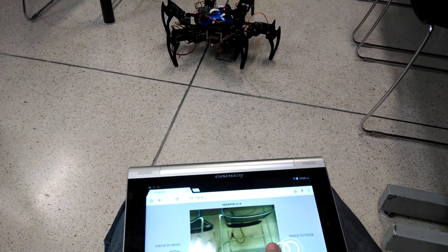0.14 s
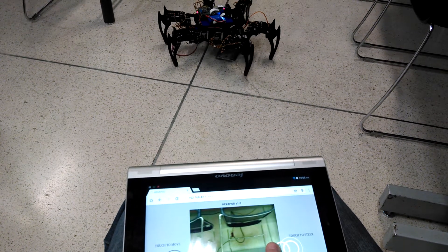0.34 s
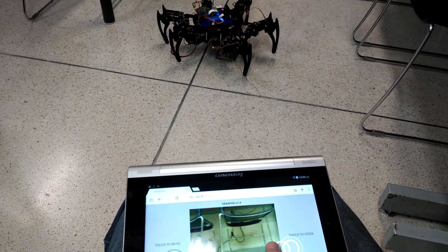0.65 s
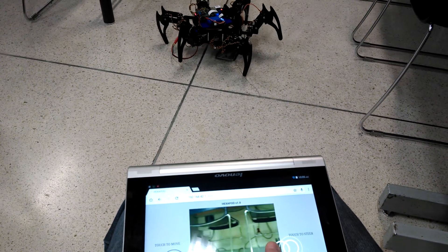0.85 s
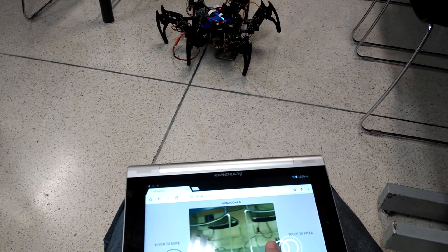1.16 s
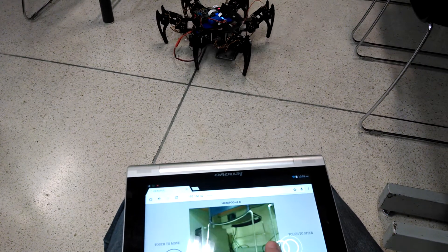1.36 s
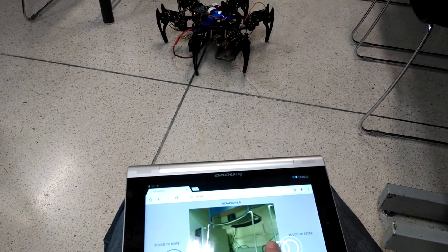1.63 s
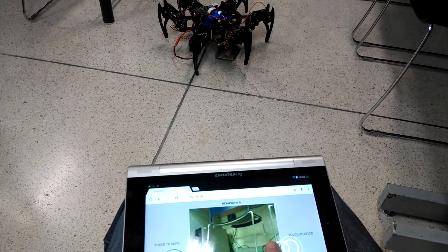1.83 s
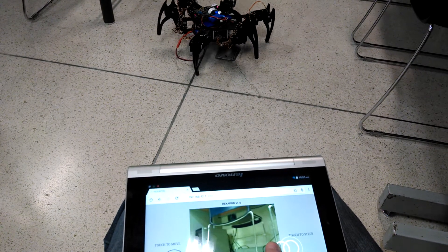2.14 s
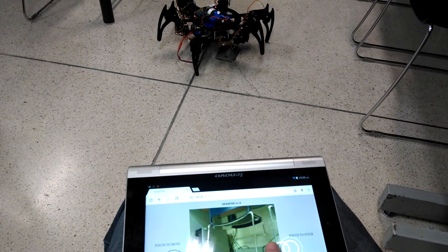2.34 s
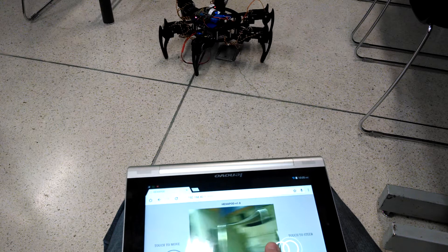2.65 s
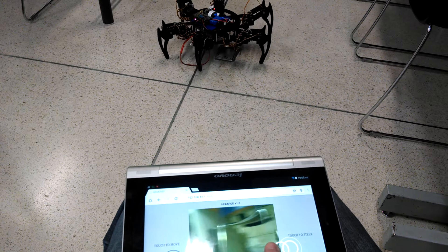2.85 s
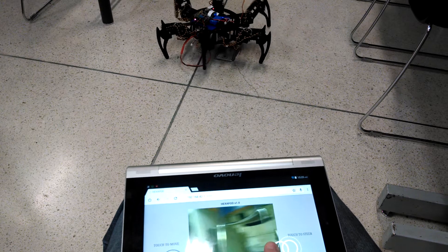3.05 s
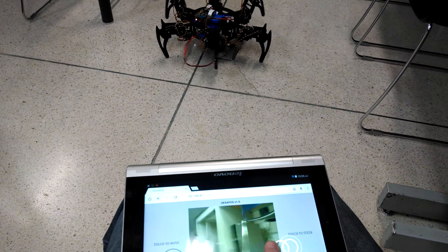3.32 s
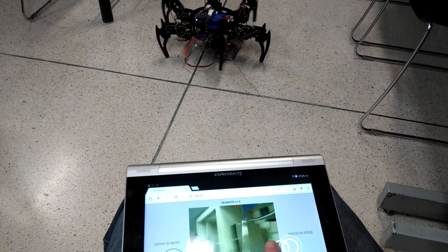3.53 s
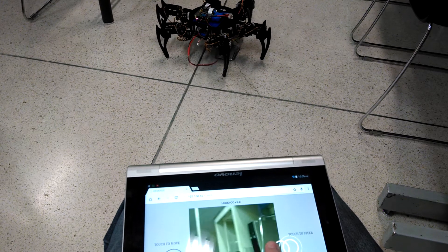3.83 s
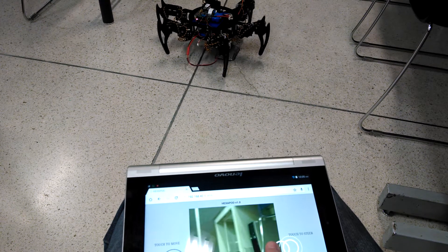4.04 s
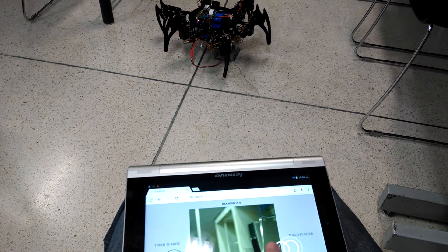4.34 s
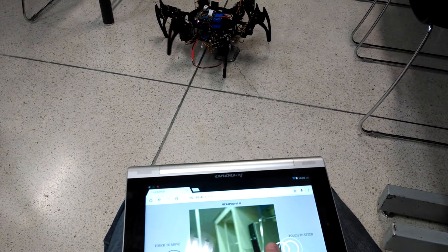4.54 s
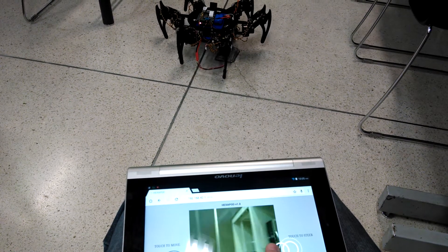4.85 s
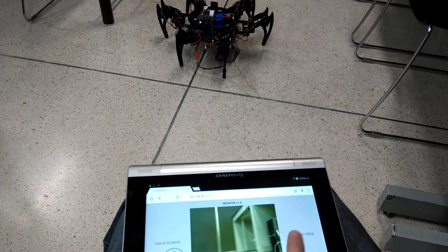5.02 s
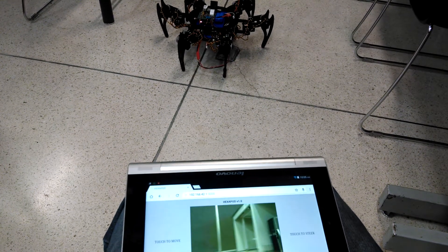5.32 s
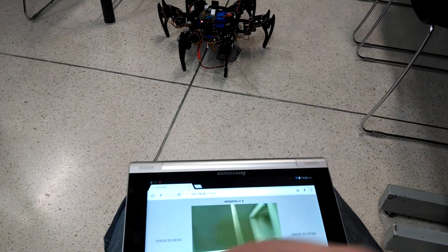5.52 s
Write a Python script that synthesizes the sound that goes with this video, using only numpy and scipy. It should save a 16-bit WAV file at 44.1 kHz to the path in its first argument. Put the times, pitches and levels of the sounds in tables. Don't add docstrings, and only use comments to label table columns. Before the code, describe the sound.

Over a quiet airy ventilation hum, a little robot steps along a hard floor: bright, raspy plastic gear strokes swell and fade, some much weaker, with thin whistles, dry clicks and snaps. Two clear footfall clacks at about 1.6 and 3.9 seconds, a softer thud at 5.2. Close stereo pickup, diffuse hall tail.

```python
import sys
import numpy as np
from scipy import signal
from scipy.fft import rfft, irfft, next_fast_len
from scipy.io import wavfile
from scipy.ndimage import uniform_filter1d

SR = 44100
rng = np.random.default_rng(int(sys.argv[2]) if len(sys.argv) > 2 else 0)


def int16_out(signal):
    q = np.round(np.clip(np.atleast_2d(signal).T, -1, 1) * 32767)
    wavfile.write(sys.argv[1], SR, q.astype(np.int16))


def how_loud(loudness_db):
    steps = np.asarray(loudness_db, float) / 20
    return 10 ** steps


N = 250481
SIZE = next_fast_len(N + SR)
HZ = np.maximum(np.fft.rfftfreq(SIZE, 1 / SR), 1)
PORT_GAP_S = 0.00041
# frequency in Hz, level in dB, t60 in seconds.
TICK_MODES = [(2120, -10, 0.0028), (2860, -4.5, 0.0022), (3500, -7, 0.0045), (3930, -1.5, 0.006),
              (4800, -17, 0.0022), (5572, 0, 0.0089), (6730, -2, 0.0056), (7657, -17, 0.004),
              (8360, -8, 0.0023), (9340, 1.5, 0.0035), (10750, 4, 0.0022), (12660, -2, 0.0043),
              (14600, -6, .003)]


def in_time(rows):
    s, *columns = np.transpose(rows)
    return [np.interp(np.arange(N) / SR, s, c) for c in columns]


def at_hz(points, hz=HZ):
    table_hz, values = np.transpose(points)
    return np.interp(np.log(hz), np.log(table_hz), values)


def shaped(x, gain):
    return irfft(rfft(x, SIZE) * gain, SIZE)[..., :N]


def rms_one(x):
    return x / np.sqrt(np.mean(x ** 2) + 1e-20)


def drift(rate_hz):
    knots = rng.standard_normal(int(N / SR * rate_hz) + 3)
    return np.interp(np.arange(N) / SR * rate_hz, np.arange(len(knots)), knots)


def peak(hz, width_hz):
    return 1 / (1 + 1j * (HZ - hz ** 2 / HZ) / width_hz)


def ring(clicks, hz, t60_s):
    r = how_loud(-60 / (t60_s * SR))
    w = 2 * np.pi * hz / SR
    return signal.lfilter([0, np.sin(w)], [1, -2 * r * np.cos(w), r * r], clicks + 1e-18)


def port_lag(lag_s):
    return np.exp(-1j * np.pi * HZ * lag_s * np.array([[1], [-1]]))


def port_pair(pair):
    alike = np.sinc(2 * HZ * PORT_GAP_S)
    mid, side = rfft(pair, SIZE) * np.sqrt([1 + alike, 1 - alike + 1e-5])
    return np.array([mid + side, mid - side]) / np.sqrt(2)


def diffuse(length):
    return irfft(port_pair(rng.standard_normal((2, length))), SIZE)[:, :length]


def nearby(t60_s=0.0073, direct=3.26, lag_s=0.000347, shadow_hz=6000):
    straight = direct / np.sqrt(1 + (HZ / shadow_hz) ** 4) * port_lag(lag_s)
    decay = how_loud(-60 * np.arange(600) / SR / t60_s)
    response = straight + port_pair(rng.standard_normal((2, 600)) * decay)
    power = np.mean(np.abs(response) ** 2, axis=0)
    return response / np.sqrt(uniform_filter1d(power, size=SIZE // 10))


def ventilation():
    # time in seconds, level in dB.
    air_level = [(0.0, -45), (0.16, -46), (0.95, -45), (1.83, -46.5), (2.04, -47.5), (2.53, -47.5),
                 (2.83, -46.5), (3.24, -47.5), (3.72, -48), (4.86, -47), (5.68, -46)]
    # frequency in Hz, density in dB per Hz.
    air_colour = [(20, 2.5), (58, 15), (78, -1), (100, 13), (125, 6), (200, 14), (330, 8.5), (600, 7),
                  (1000, 6), (2000, 0), (2750, -2.5), (4000, -11.5), (8000, -13.5), (16000, -15.5)]
    # start in seconds, end in seconds, frequency in Hz, wander in Hz, level in dB.
    fan_tones = [(0, 2.6, 527.6, 3.65, -56), (2.7, 3.3, 528, 1.93, -59.5), (3.5, 4.3, 523, 3.12, -62.5),
                 (5.4, 5.5, 536, 8, -60), (5.45, 5.6, 598, 3.6, -59), (.78, 1.3, 846, 3.4, -59),
                 (1.12, 1.31, 866, 6.3, -57), (1.33, 1.6, 873, 7.4, -61), (0, 0.87, 643, 7.5, -61),
                 (0, 0.24, 104.7, 6.3, -56), (1.2, 2, 99.5, 2.9, -57.5), (1.2, 1.36, 143, 3.4, -57.5),
                 (1.8, 2.5, 100.8, 6.1, -65), (2.9, 3.5, 280, 4.83, -56), (3.45, 4.45, 232.2, 8.6, -56),
                 (4.052, 4.87, 336, 4.72, -59), (5.25, 5.4, 90.7, 3.7, -50.5), (5.37, 5.9, 142.8, 4.2, -56)]
    t = np.arange(N) / SR
    rush = shaped(diffuse(N), how_loud(at_hz(air_colour)))
    midrange = shaped(rush, (HZ > 400) & (HZ < 1500))
    rush = rush / np.std(midrange) * how_loud(in_time(air_level)[0] - 1.0 + 0.66 * drift(8))
    for start, end, hz, wander_hz, db in fan_tones:
        gate = np.clip(np.minimum(t - start + 0.039, end - t + 0.06) / 0.066, 0, 1)
        tone = np.sin(2 * np.pi * np.cumsum(hz + wander_hz * drift(15)) / SR)
        flutter_db = 3.5 * drift(9) + 1.5 * np.array([drift(9), drift(9)])
        rush += how_loud(db + 4.0 + flutter_db) * gate * tone
    return rush


def hall(x, onset_s=0.0027):
    # frequency in Hz, t60 in seconds.
    hall_t60 = [(100, 1.85), (400, 1.3), (1500, 0.79), (5000, 1.16), (14000, 0.42)]
    t = np.arange(SR) / SR
    noise = diffuse(SR)
    onset = 1 - np.exp(-t / onset_s)
    tail = 0
    edges_hz = np.geomspace(60, 18000, 9)
    for low, high in zip(edges_hz, edges_hz[1:]):
        sos = signal.butter(2, [low, high], "band", fs=SR, output="sos")
        decay = how_loud(-60 * t / at_hz(hall_t60, np.sqrt(low * high)))
        band = signal.sosfilt(sos, noise) * decay * onset
        tail = tail + band / np.sqrt(np.sum(band ** 2) / 2 * SR / 2 / (high - low))
    return shaped(x, rfft(tail, SIZE))


def blows(events, modes, split_hz, scatter_db, contact_s, rough, tilt_offset_db=0):
    start_s, peak_db, tilt_db = np.transpose(events)
    at = (start_s * SR).astype(int)
    chance = rng.standard_normal((len(at), len(modes)))
    contact = np.hanning(int(contact_s * SR) + 3)
    contact_t = (np.arange(len(contact)) - len(contact) / 2) / SR
    out = np.zeros(N)
    for k, (hz, db, t60_s) in enumerate(modes):
        upper_db = (tilt_db + tilt_offset_db) * (hz > split_hz)
        clicks = np.zeros(N)
        clicks[at] = how_loud(peak_db + db + upper_db + scatter_db * chance[:, k])
        push = contact * np.cos(2 * np.pi * (hz * contact_t + rough * rng.random()))
        out += ring(np.convolve(clicks, push * 2 / contact.sum())[:N], hz, t60_s)
    return out


def frame_thuds():
    # start in seconds, peak in dB, share of the upper modes in dB.
    thud_events = [(0.405, -29.5, -3.5), (0.668, -52, -4), (1.612, -18, -4), (1.629, -26.5, 6),
                   (1.649, -20.5, 2), (1.6591, -21.5, 2.5), (1.6877, -21.5, -8), (1.695, -33, 0),
                   (1.71, -30, -4), (1.727, -22.5, -9), (1.755, -30, -11), (1.787, -32, -11),
                   (2.75, -33.5, -1.5), (3.225, -31.5, -3), (3.873, -25.5, -0.5), (3.884, -34, 4),
                   (3.906, -23, 0.5), (3.912, -35, -4), (3.939, -31, 2), (3.948, -30, -4), (3.968, -29, -2),
                   (3.99, -29, -3), (4.04, -35.5, -1), (4.06, -30, -3), (5.182, -25.5, -1),
                   (5.212, -27, -1), (5.229, -30, 0.5), (5.269, -29, -3), (5.312, -36, -3), (5.346, -48, 0)]
    # frequency in Hz, level in dB, t60 in seconds.
    thud_modes = [(150, -15, 0.051), (201, -4.5, 0.04), (238, -4, 0.034), (286, 3.5, 0.041),
                  (335, 2.5, 0.029), (390, -7.5, 0.021), (450, -6, 0.014), (560, -6.5, 0.015)]
    thuds = -blows(thud_events, thud_modes, split_hz=240, scatter_db=4.5, contact_s=0.0037, rough=0)
    thuds = np.roll(thuds * how_loud(-11.5), -int(.003 * SR))
    return signal.sosfilt(signal.butter(4, 125, "high", fs=SR, output="sos"), thuds)


def foot_ticks():
    # start in seconds, peak in dB, brightness in dB.
    tick_events = [(0.049, -27.5, -4), (0.295, -31, -4), (0.3137, -37, 0), (0.5256, -32, -1),
                   (0.5484, -23, -1), (0.8322, -32, -7), (1.196, -34.5, 2), (1.451, -29, 4.5),
                   (1.6137, -10.5, -4), (1.6151, -17, -10), (1.616, -17, -8), (1.628, -21, -11),
                   (1.633, -16, -18), (1.687, -19.5, -10), (1.8355, -23, -4), (2.5379, -41, -9),
                   (2.557, -31.5, -4), (2.8275, -23, -14), (3.3215, -40, -3), (3.3353, -32, -5),
                   (3.3869, -31, -19), (3.4495, -33, 2), (3.5428, -41, -1.5), (3.7112, -32.5, 2),
                   (3.8754, -8, -4), (3.876, -20, -2), (3.8888, -15.5, -12), (3.897, -29.5, -10),
                   (3.9087, -27, -4), (4.1451, -30, -14), (4.3332, -29, -13.5), (4.7907, -41, -1),
                   (4.8153, -30, 0), (5.074, -29, -7)]
    return how_loud(0.5) * blows(tick_events, TICK_MODES, split_hz=8500, scatter_db=2.0,
                            contact_s=.0004, rough=0.88, tilt_offset_db=3)


def backlash_snaps():
    # start in seconds, peak in dB, brightness in dB.
    snap_events = [(0.1014, -24, -1), (0.2738, -26, -2), (0.3354, -23, 0), (0.364, -25, 0),
                   (0.3874, -23, 6), (0.5753, -21, 0), (0.6034, -21, 0), (1.3478, -26, 0), (1.5614, -26, 0),
                   (1.8133, -26, 0), (1.8794, -24, 0), (2.593, -22, 0), (2.6153, -21, 2), (2.6434, -21, 0),
                   (2.6597, -24, 4), (2.696, -18, 3), (2.7117, -17, 2), (2.7164, -17, 0), (2.8524, -21, 0),
                   (2.8724, -21, 0), (3.1018, -29, 0), (3.5663, -33, 0), (3.8222, -26, 0), (4.1041, -24, 0),
                   (4.1225, -23, 0)]
    return how_loud(-10.5) * blows(snap_events, TICK_MODES, split_hz=6000, scatter_db=5.5,
                              contact_s=0.00029, rough=0.85, tilt_offset_db=3)


def mesh_whistles(pitch_rise=0.0148):
    # start in seconds, length in seconds, frequency in Hz, width in Hz, level in dB.
    whistles = [(0.031, 0.13, 9210, 400, -39.5), (0.288, 0.065, 9170, 400, -41),
                (0.543, 0.059, 5130, 500, -42), (0.592, 0.043, 7820, 350, -37),
                (0.821, 0.076, 4800, 198, -47), (1.345, 0.059, 5190, 200, -44),
                (1.624, 0.03, 4890, 250, -35), (1.823, 0.0418, 6550, 150, -41),
                (2.565, 0.058, 2000, 250, -52), (2.701, 0.049, 2395, 403, -46),
                (2.814, 0.06, 5150, 500, -43), (2.851, 0.07, 7740, 400.4, -37),
                (3.094, 0.048, 5000, 400, -43), (4.08, 0.042, 6420, 121.2, -49),
                (4.109, 0.082, 3800, 80, -49), (4.11, 0.057, 7640, 120, -45),
                (4.811, 0.13, 9430, 399, -43.5), (5.068, 0.13, 9360, 400, -37.5),
                (5.107, 0.091, 2000, 400, -51)]
    out = np.zeros(N)
    for s, length_s, hz, width_hz, db in whistles:
        t = np.arange(int(length_s * SR)) / SR
        pole = np.exp(-np.pi * width_hz / SR)
        wobble = signal.lfilter([1], [1, -pole], rng.standard_normal((2, 6000)))[:, -len(t):]
        glide_hz = hz * (1 + pitch_rise * (t / length_s - .5))
        tone = np.exp(2j * np.pi * np.cumsum(glide_hz) / SR)
        rough_tone = rms_one(((wobble[0] + 1j * wobble[1]) * tone).real)
        out[int(s * SR):][:len(t)] += how_loud(db + 7.0) * np.hanning(len(t)) * rough_tone
    return out


def stroke_gains():
    # middle in seconds, half length in seconds, rattle in dB, low share in dB, high share in dB.
    strokes = [(0.092, 0.059, -40, -5, 0.5), (0.359, 0.059, -35.5, -11, 1), (0.587, 0.061, -36.5, -3.5, -2),
               (0.868, 0.049, -38.5, -2, -4), (1.124, 0.059, -49.5, 3.5, -1.5), (1.292, 0.023, -57, -3, 3),
               (1.377, 0.062, -40, -5, -1.5), (1.575, 0.035, -40, -10, -0.5), (1.633, 0.043, -36, 4, 2),
               (1.875, 0.059, -35.5, -2.5, -0.5), (2.133, 0.052, -38, -1.5, -1), (2.365, 0.06, -49, 2, -2),
               (2.629, 0.06, -36.5, -5, 0.5), (2.709, 0.044, -37, -6, 5.5), (2.87, 0.056, -35.5, -6, -2),
               (3.127, 0.05, -38, -1, -2.5), (3.376, 0.065, -49, -3, -3), (3.63, 0.057, -39.5, -5, -0.5),
               (3.87, 0.054, -36.5, -6, -0.5), (4.138, 0.054, -36, -4, -2), (4.376, 0.05, -38.5, -2, -1.5),
               (4.622, 0.065, -49, 1.5, -1.5), (4.876, 0.062, -41, -5.5, 1.5),
               (5.14, 0.065, -38, -5.5, 1.5)]
    coast_shares_db = [2.5, 4, 5, 0.13, -1]
    half_drop_db, rise_power, fall_power = 8.5, 1.7, 1.6
    coast_db, coast_db_per_s, coast_in_s = -11, 75, .04
    middle_s, half_s, db, low_db, high_db = np.transpose(strokes)[:, :, None]
    hop = 64
    late_s = np.arange(0, N + hop, hop) / SR - middle_s
    flank_power = np.where(late_s < 0, rise_power, fall_power)
    swell = how_loud(db - half_drop_db * np.abs(late_s / half_s) ** flank_power)
    coast = how_loud(db + coast_db - coast_db_per_s * late_s.clip(0)) * np.clip(late_s / coast_in_s, 0, 1)
    shares_db = [-9 + 0.99 * high_db, low_db, low_db - 1.8 * high_db, 0, high_db]
    gains = []
    for stroke_share_db, coast_share_db in zip(shares_db, coast_shares_db):
        power = (swell * how_loud(stroke_share_db)) ** 2 + (coast * how_loud(coast_share_db)) ** 2
        gain = np.sqrt(np.sum(power, axis=0))
        gains.append(np.interp(np.arange(N) / hop, np.arange(len(gain)), gain))
    return gains


def servos(count=6, mesh_hz=1900, wander=.05, tooth_share=1.6, grit_db=3.0, patchy_db=1.0):
    # frequency in Hz, density in dB per Hz.
    rattle_colour = [(800, -35), (1300, -20.5), (2300, -15.5), (2750, -8), (3300, -9.5), (4600, -2),
                     (5200, 0.5), (6700, -3.5), (8000, 0.5), (9400, -5.5), (11000, -4.5), (13500, -8),
                     (15500, -6.5)]
    # frequency in Hz, width in Hz, level in dB.
    case_modes = [(2000, 360, -45.5), (2650, 410, -42), (3560, 100, -44.5), (5000, 83, -32),
                  (6550, 2000, -34), (8400, 130, -35), (9210, 220, 5.5), (11150, 400, -25),
                  (11750, 1200, -3.5)]
    gains = stroke_gains()
    rattle_db = 20 * np.log10(gains[3] + 1e-9)
    speed = np.clip(0.5 + (rattle_db + 40) / 120, .5, 1.2)
    duty = how_loud(6 * np.array([drift(6) for k in range(count)]))
    duty = duty / np.sqrt(np.mean(duty ** 2, axis=0))
    heard = 0
    for k in range(count):
        turns = np.cumsum(mesh_hz * rng.uniform(.6, 1.3) * speed * (1 + wander * drift(30)) / SR)
        teeth = np.diff(np.floor(turns), prepend=0) * how_loud(5.15 * rng.standard_normal(N).clip(-3, 2))
        grit = rng.standard_normal(N) * how_loud(grit_db * np.minimum(rng.exponential(1, N), 4))
        case = 1.4
        for i, (hz, width_hz, db) in enumerate(case_modes):
            case = case + how_loud(db) * peak(hz * rng.uniform(1.0, 1.04), width_hz) * (-1) ** i
        strikes = tooth_share * how_loud(1.44 * drift(20)) * rms_one(teeth - teeth.mean()) + rms_one(grit)
        strikes = strikes * duty[k] * how_loud(patchy_db * drift(40))
        heard = heard + rfft(strikes, SIZE) * case * nearby()
    heard = heard * how_loud(at_hz(rattle_colour))
    below = [1 / (1 + (hz / HZ) ** 16) for hz in (2900, 4600, 5600, 8500)]
    bands = [irfft(heard * (a - b), SIZE)[:, :N] for a, b in zip([1] + below, below + [0])]
    band_db = [14.1, 1.0, 1.5, 0.79, 0.5]
    mix = sum(band * gain * how_loud(db) for band, gain, db in zip(bands, gains, band_db))
    return how_loud(2.0) * mix / np.std(bands[3])


def scene():
    gears = servos() + shaped(mesh_whistles(), nearby(lag_s=0))
    ticks = foot_ticks() + backlash_snaps()
    thuds = frame_thuds()
    wet = how_loud(-7.5) * gears.mean(0) + how_loud(-5.5) * ticks + how_loud(2.0) * thuds
    shade = how_loud(np.array([[-0.5], [-4.0]]))
    near_ticks = shaped(ticks, nearby(t60_s=.004, direct=9.0, shadow_hz=16000)) * shade
    return gears + near_ticks + shaped(thuds, port_lag(.00008)) + hall(wet) + ventilation()


def roll_off(x):
    return signal.sosfilt(signal.butter(12, 16660, fs=SR, output="sos"), x)


def record(dry):
    # frequency in Hz, level in dB.
    port_shade = [(60, 0), (140, 0.5), (330, 0.5), (2000, 3.5), (5000, -1.5), (10000, -5.5), (15000, -12)]
    # frequency in Hz, share from 0 to 1.
    cross_share = [(100, .87), (400, .96), (1350, .95), (2400, .68), (2750, .72), (4100, .9), (4550, .62),
                   (5200, .5), (6700, .38), (8100, .33), (11000, .15), (15000, .12)]
    null_hz, cutoff_hz = 2722, 15690
    cross = np.clip(at_hz(cross_share), 0, .995) * np.exp(-2j * np.pi * HZ / null_hz)
    bass_restore = 1 / np.abs(1 - cross)
    restore = np.where(HZ < null_hz / 4, bass_restore, 1 / np.sqrt(1 + np.abs(cross) ** 2))
    ports = np.array([shaped(dry[0], how_loud(at_hz(port_shade))), dry[1]])
    beams = shaped(ports, restore) - shaped(ports[::-1], restore * cross)
    bass_tilt_db = np.array([[1.2], [-1.2]]) / (1 + (HZ / 170) ** 2)
    beams = shaped(beams, how_loud(bass_tilt_db))
    beams = beams + how_loud(-65) * rng.standard_normal(beams.shape)
    beams = shaped(beams, np.clip((cutoff_hz - HZ) / 200, 0, 1) ** 2)
    return roll_off(beams)


dry = scene()
out = record(dry)
int16_out(out)
```